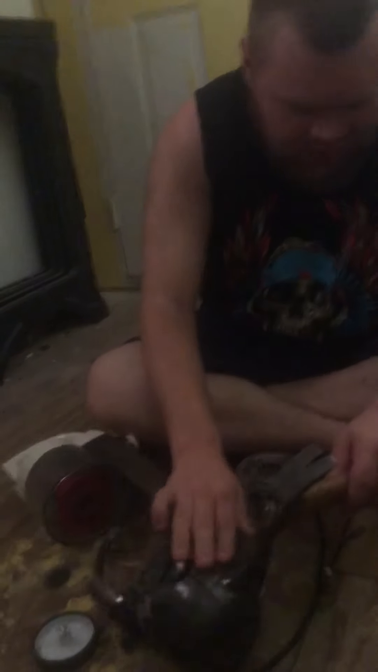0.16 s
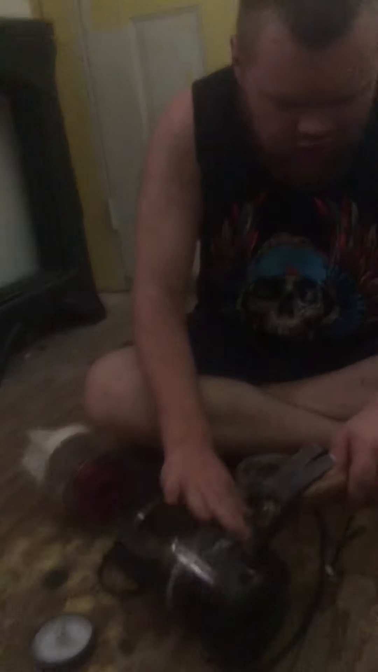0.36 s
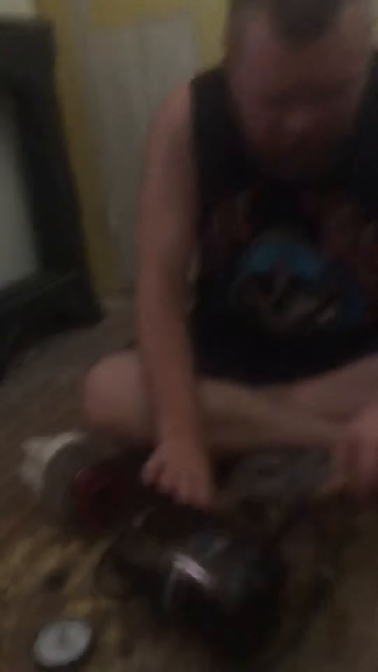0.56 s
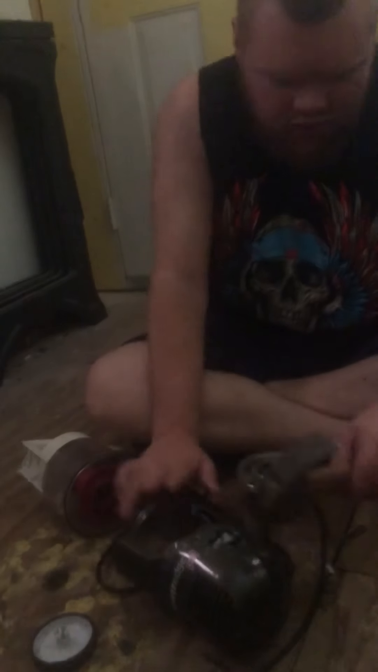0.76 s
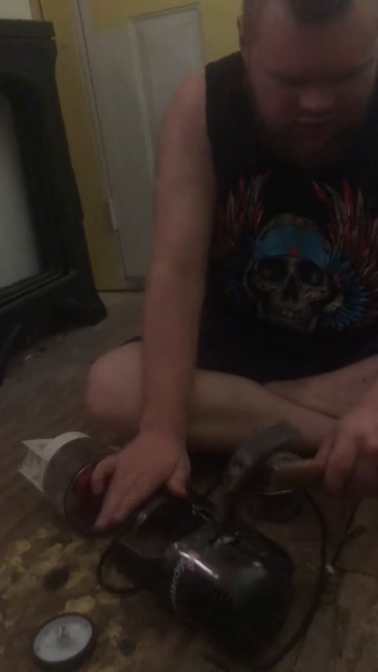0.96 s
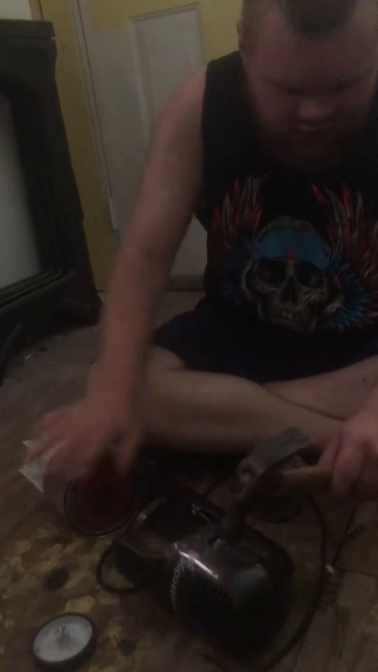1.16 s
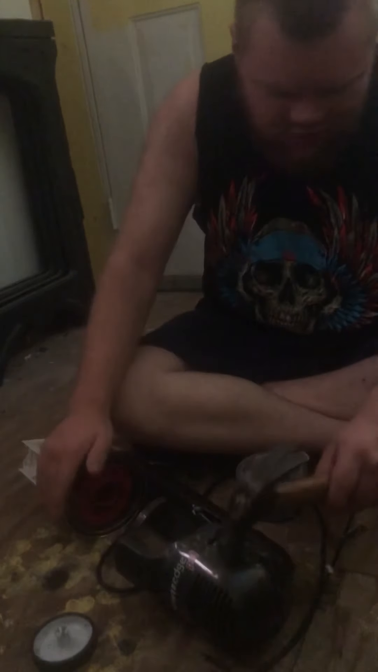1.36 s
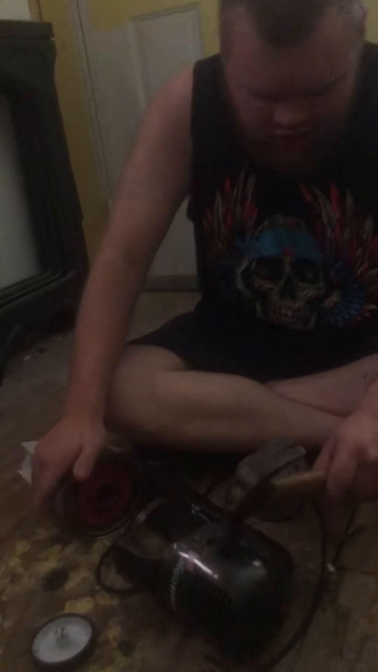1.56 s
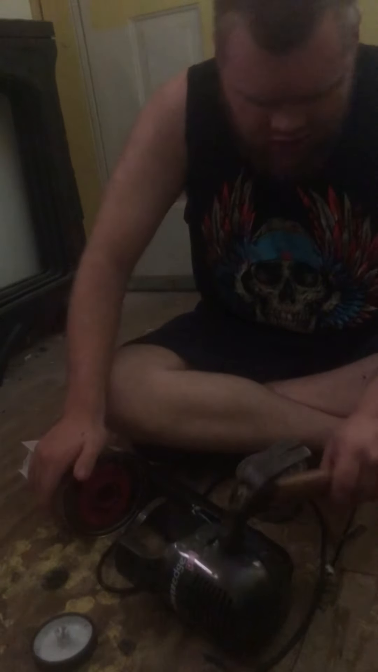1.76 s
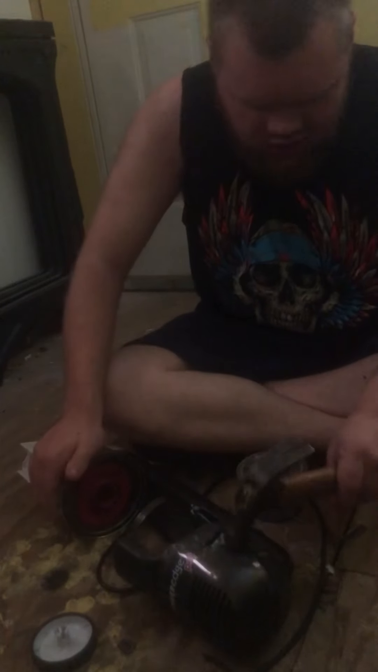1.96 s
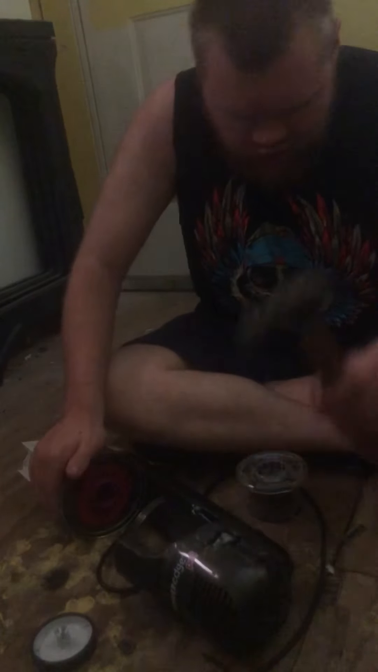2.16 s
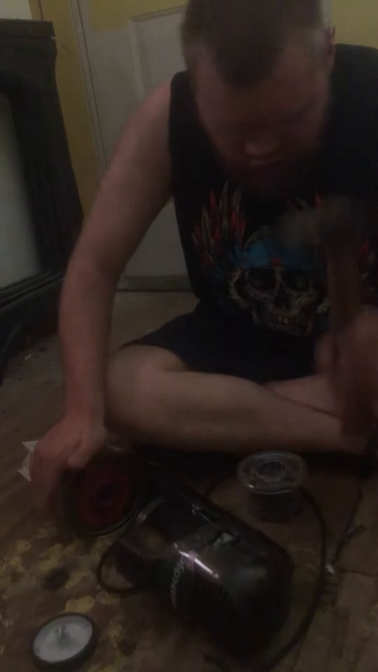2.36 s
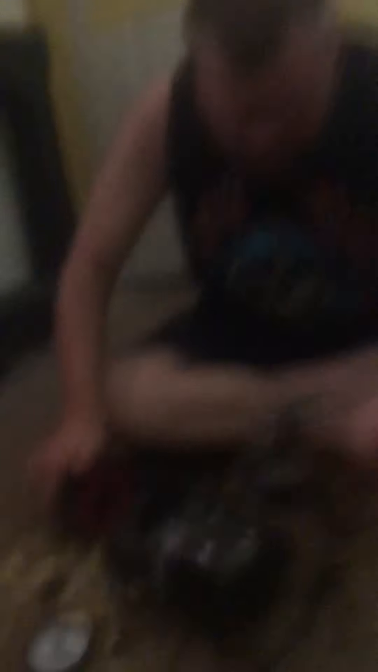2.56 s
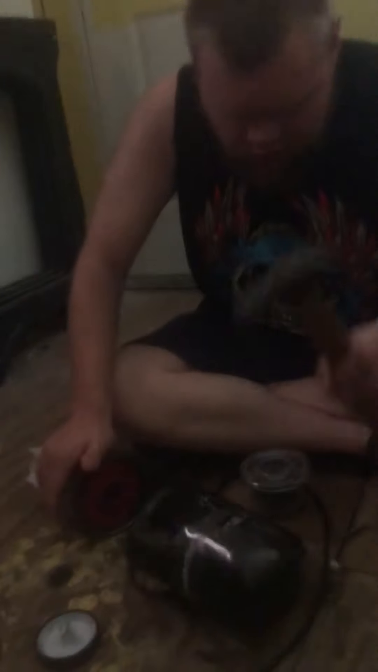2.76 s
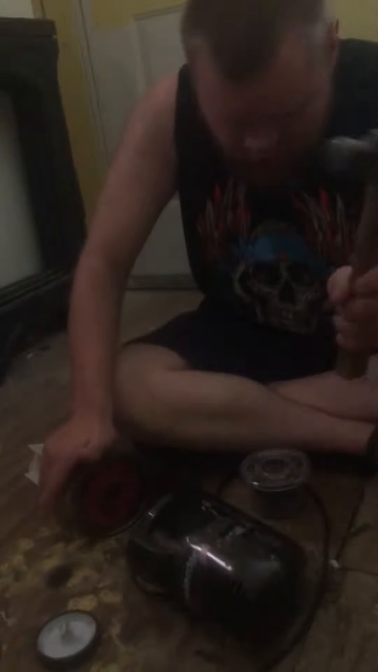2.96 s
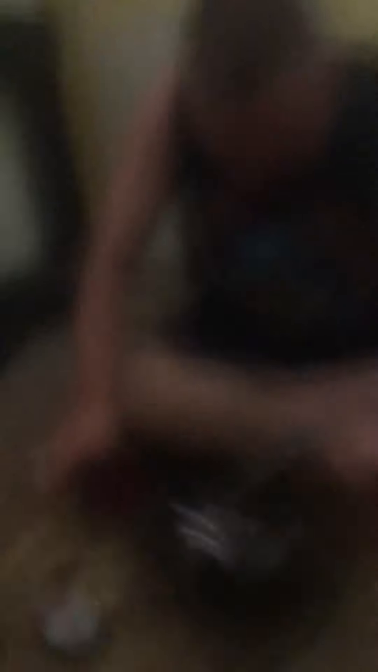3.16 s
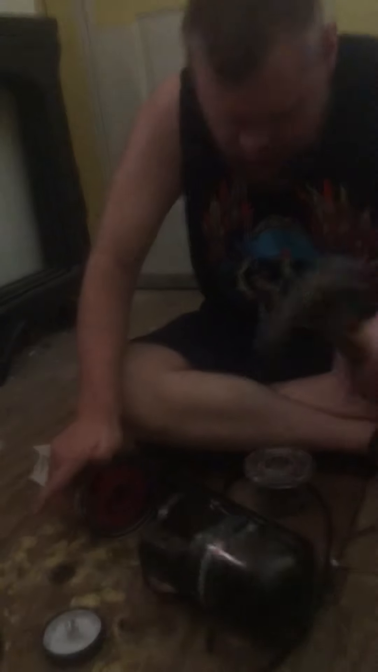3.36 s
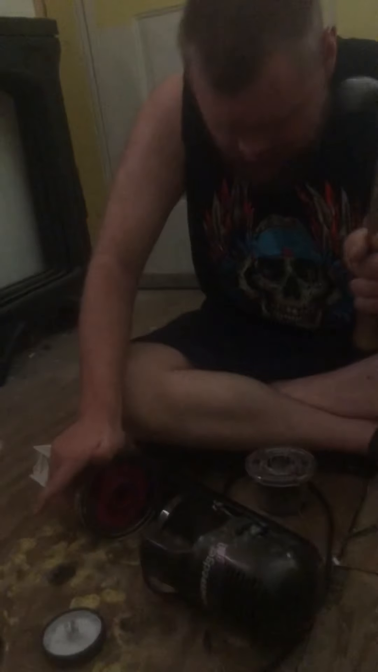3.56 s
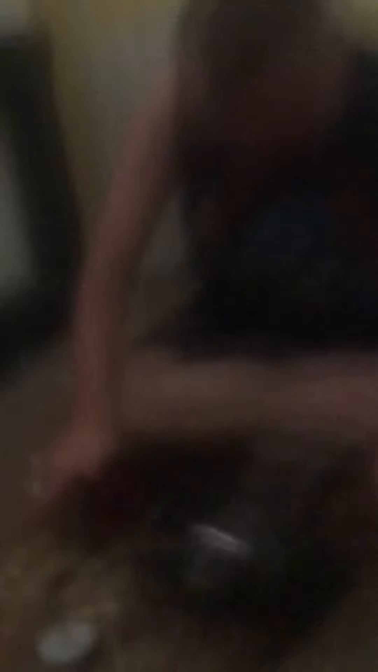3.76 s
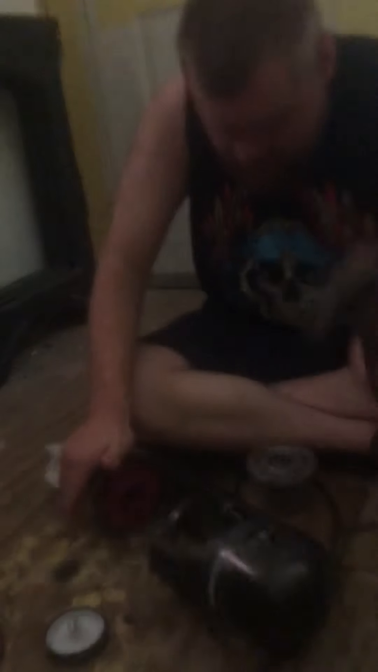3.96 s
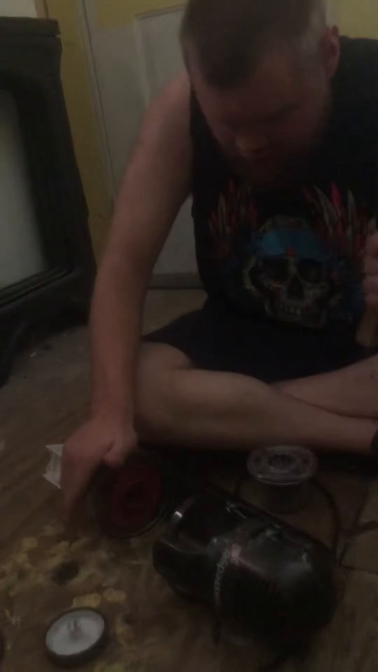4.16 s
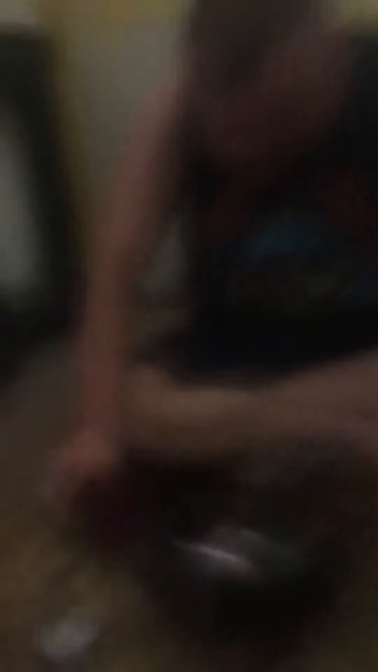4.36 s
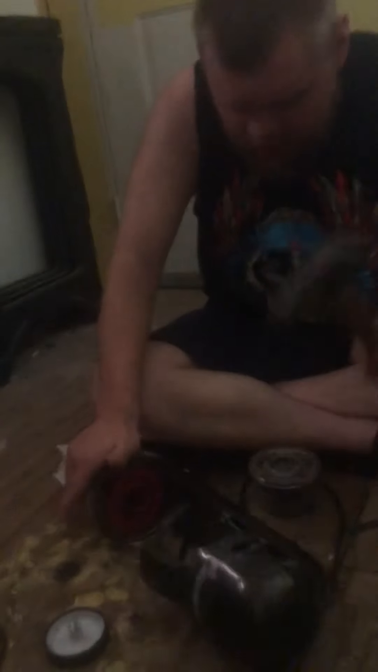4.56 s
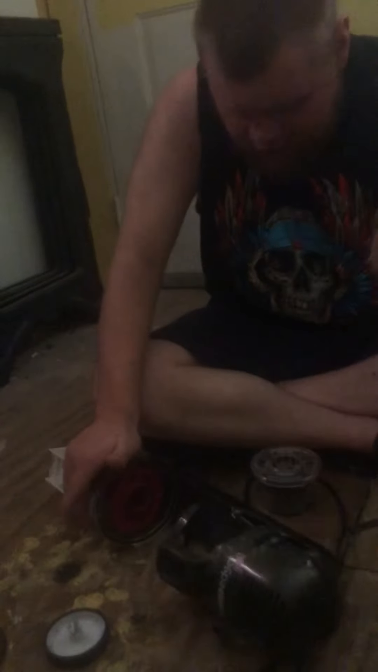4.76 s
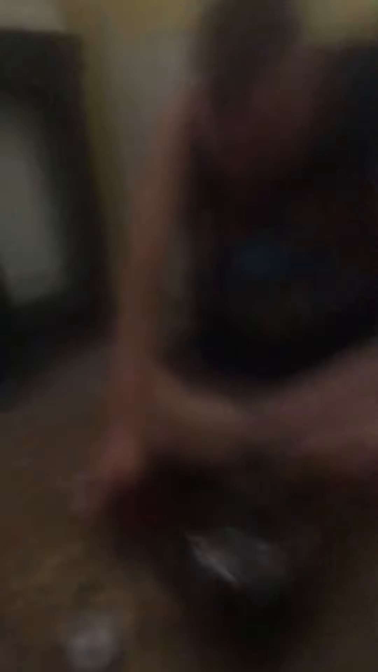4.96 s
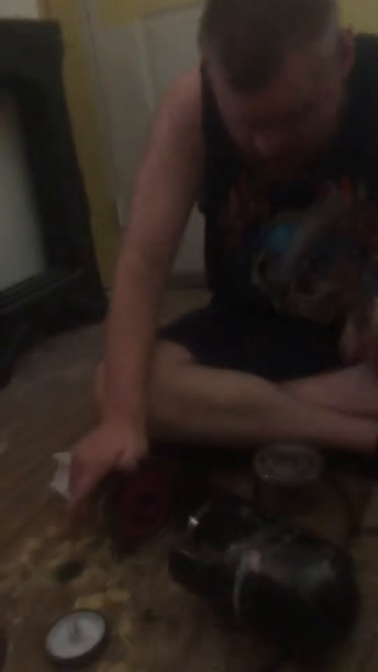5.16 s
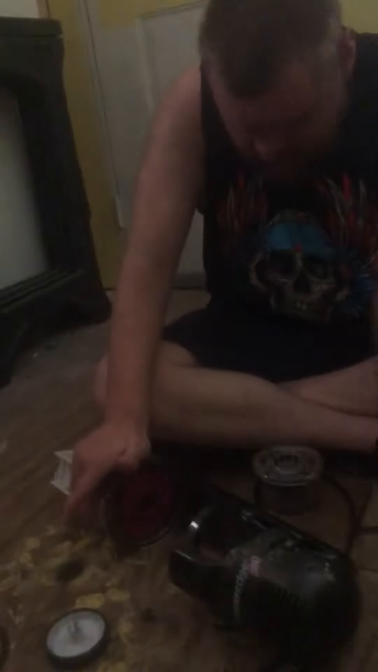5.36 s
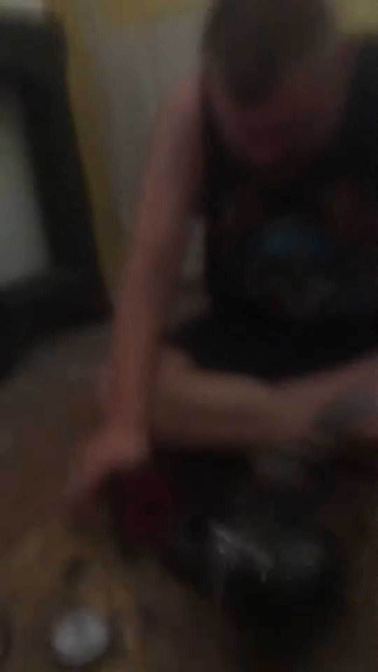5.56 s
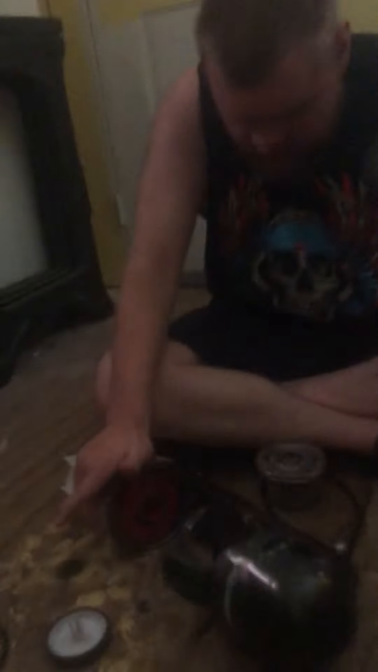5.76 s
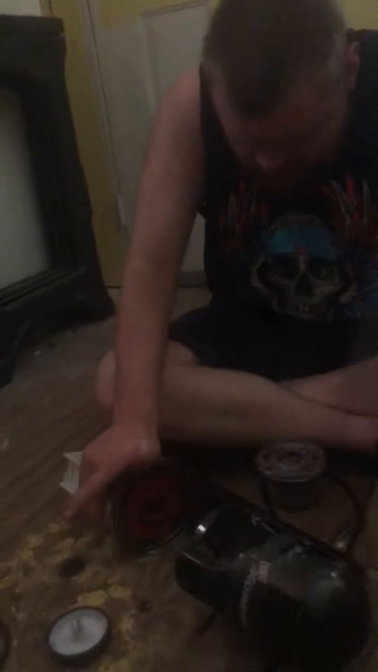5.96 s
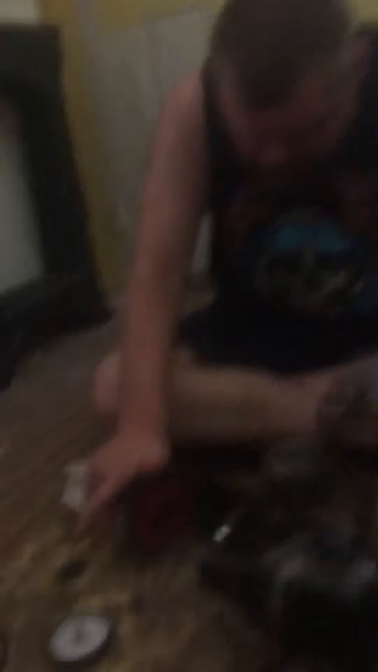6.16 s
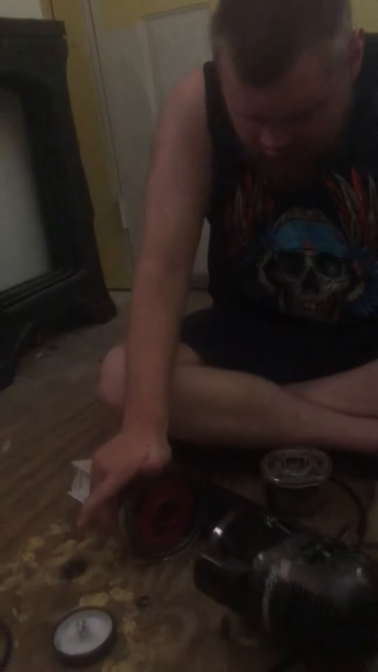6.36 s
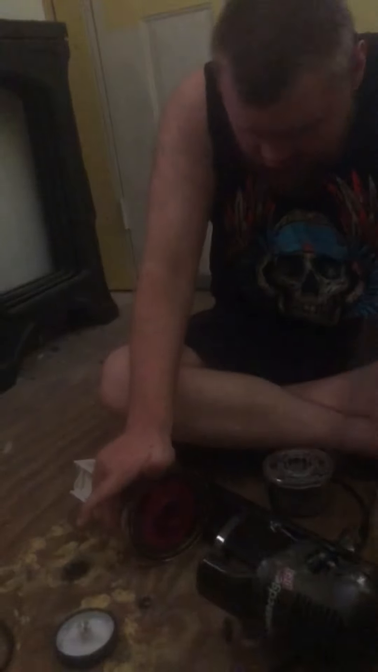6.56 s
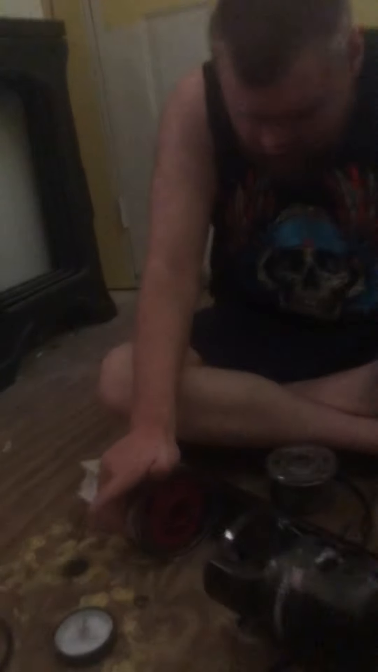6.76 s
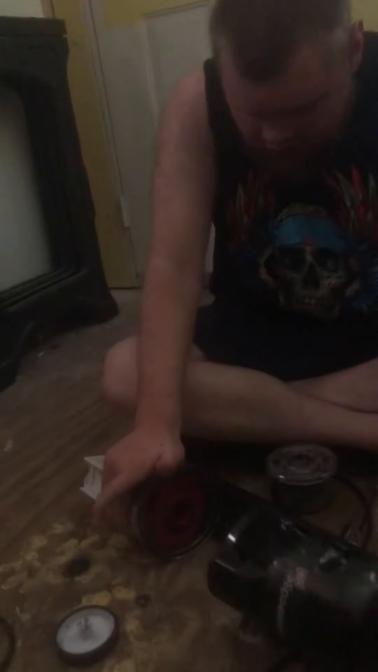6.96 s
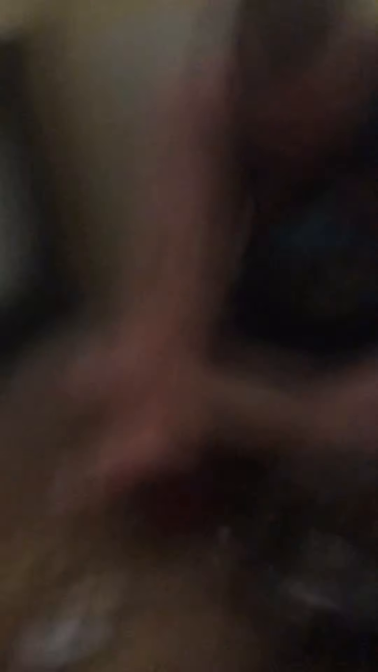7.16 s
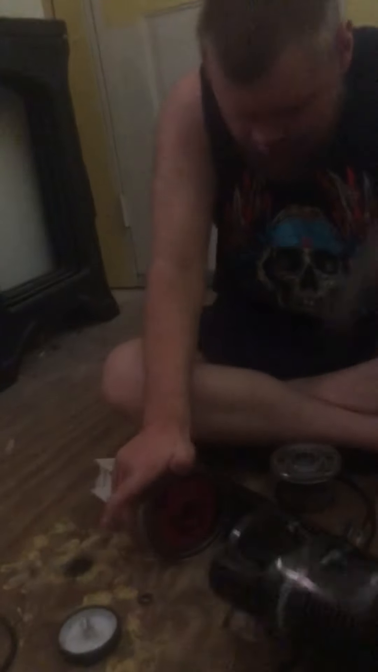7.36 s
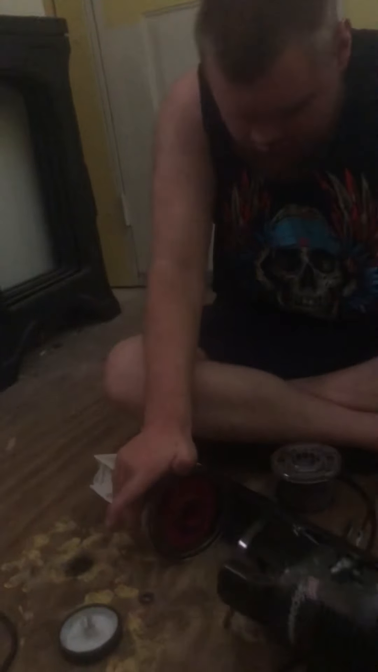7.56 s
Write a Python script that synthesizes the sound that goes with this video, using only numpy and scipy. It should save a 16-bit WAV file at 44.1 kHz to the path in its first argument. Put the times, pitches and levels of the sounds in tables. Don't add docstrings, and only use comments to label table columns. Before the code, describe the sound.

Close, slightly overloaded sound indoors on a wooden floor: a low unsteady motor whine, light handling clicks and a hollow knock, about two seconds of near calm, then nine hard hammer cracks on brittle plastic at a steady pace. Each bursts loud and compressed, rattles hollowly and dies quickly, with floor rumble. Broken bits tick, ring faintly and scrape, most audibly after later blows.

```python
import sys
import numpy as np
from scipy import signal
from scipy.fft import rfft, irfft, next_fast_len
from scipy.io import wavfile
from scipy.ndimage import uniform_filter1d

SR = 44100
rng = np.random.default_rng(int(sys.argv[2]) if len(sys.argv) > 2 else 0)


def gain_from_decibels(decibels):
    exponent = np.asarray(decibels, float) / 20
    return 10 ** exponent


def master_out(mix):
    frames = np.transpose(np.atleast_2d(mix))
    ceiling = np.clip(frames, -1, 1)
    pcm = np.round(ceiling * 32767).astype(np.int16)
    wavfile.write(sys.argv[1], SR, pcm)


N = 334754


def unit(x):
    return x / np.sqrt(np.mean(x ** 2) + 1e-20)


def along(points, hz):
    f, v = np.transpose(points)
    return np.interp(np.log(hz + 1), np.log(f + 1), v)


def filtered(x, response):
    m = next_fast_len(len(x) + 8192)
    return irfft(rfft(x, m) * response(np.fft.rfftfreq(m, 1 / SR)), m)[:len(x)]


def modes(table):
    def response(f):
        return sum((-1) ** k * gain_from_decibels(db) * 1j * f * w / (c * c - f * f + 1j * f * w)
                   for k, (c, w, db) in enumerate(table))
    return response


def high(hz):
    return lambda f: (1j * f / (hz + 1j * f)) ** 2


def wobble(count, rate_hz):
    knots = np.arange(count) * min(rate_hz, 390) / SR
    return np.interp(knots, np.arange(3100), rng.standard_normal(3100))


def gritty(count, rate_hz, depth_db):
    return rng.standard_normal(count) * gain_from_decibels(depth_db * wobble(count, rate_hz))


def evened(x, span_s):
    power = np.abs(uniform_filter1d(unit(x) ** 2, size=int(span_s * SR)))
    return x / np.sqrt(0.045 + 0.87 * power) / np.std(x)


def add(track, s, sound):
    part = track[max(round(s * SR), 0):][:len(sound)]
    part += sound[:len(part)]


def since(t, times):
    times = np.r_[-99, times]
    return t - times[np.searchsorted(times, t, side="right") - 1]


# (frequency [Hz], rms level [dB])
MOTOR = [(91.5, -50.5), (118.4, -55), (172.3, -52), (285.3, -55), (855.9, -63), (1023, -53.5),
         (1082, -63.5), (1534, -61.5), (1593, -57.5), (1647, -65), (1820, -61.5), (1981, -63.5),
         (2051, -55.5), (2083, -66), (2143, -59), (2196, -63.5), (2266, -58.5), (2326, -66), (2449, -74),
         (2896, -66.5), (3784, -63.5), (3876, -65.5), (3941, -70), (4301, -66)]
# (frequency [Hz], width [Hz], level [dB])
CASING = [(1040, 61, -1.5), (1710, 51, -6), (1750, 20, -13), (2225, 130, 3), (3927, 180, -1)]
# (frequency [Hz], density [dB per Hz])
AIR = [(180, -30.5), (300, 1), (624, -1.5), (946, 0), (1030, -6), (1150, -2), (1430, -7), (1930, -6.5),
       (2210, -2.5), (2650, -11.5), (3890, -10.5), (4750, -15.5), (16000, -34)]
# (frequency [Hz], density [dB per Hz])
RUMBLE = [(15, -42), (25, -37), (43, 5), (102, 2.5), (127, 2.5), (145, -5), (177, -2), (600, -15),
          (780, -40), (1320, -120)]


def hum():
    whine_db, rumble_db = -49, -45
    duck_db, return_db_per_s = 9.5, 1
    pinch_db, pinch_s = 12.5, 0.12
    shudder_db, shudder_t60_s, shudder_rise_s = -32, 0.96, 0.05
    t = np.arange(N) / SR
    hard_s = since(t, [b[0] for b in BLOWS[1:]])
    any_s = since(t, [b[0] for b in BLOWS])
    ducked_db = np.maximum(duck_db - return_db_per_s * hard_s, 0)
    pinched_db = pinch_db * np.exp(-(hard_s / pinch_s) ** 2)
    shudder = gain_from_decibels(shudder_db - 60 * any_s / shudder_t60_s) * (1 - np.exp(-any_s / shudder_rise_s))

    lines = np.zeros(N)
    for hz, db in MOTOR:
        level = gain_from_decibels(db - 1.0 + 1.3 * wobble(N, 9.7))
        lines += level * np.sin(2 * np.pi * hz * t + 1.1 * wobble(N, 7.8))
    air = gain_from_decibels(-50) * unit(filtered(rng.standard_normal(N), lambda f: gain_from_decibels(along(AIR, f))))
    casing = unit(filtered(rng.standard_normal(N), lambda f: modes(CASING)(f) ** 2))
    casing *= gain_from_decibels(-55 + 3.0 * wobble(N, 16))
    rumble = unit(filtered(gritty(N, 25, 0.33), lambda f: gain_from_decibels(along(RUMBLE, f))))
    whine = gain_from_decibels(whine_db + 50 - ducked_db - pinched_db) * (lines + air + casing)
    return whine + np.hypot(gain_from_decibels(rumble_db - ducked_db), shudder) * rumble


# (time [s], peak [dB], centre [Hz], knock [dB])
HANDLING = [(0.475, -16.5, 4280, 5), (0.5, -30, 5000, -8), (0.5132, -23, 11090, -25),
            (0.527, -31, 9400, -25), (0.5394, -31, 8540, -20), (1.281, -32, 5070, -5),
            (1.5464, -31, 4520, 3), (2.0482, -44, 15000, -5), (2.2154, -44, 4640, 0),
            (2.356, -38, 8580, -5)]
# (time [s], peak [dB], centre [Hz], knock [dB])
CHIPS = [(2.7646, -40, 6360, -12), (3.41, -30.5, 6900, -13), (4.5075, -20.5, 5350, -25),
         (4.5752, -32, 7340, -17), (4.728, -42, 5700, 4), (5.1334, -28, 4650, -15), (5.17, -29, 5900, -26),
         (5.187, -33, 5180, -20), (5.233, -39, 5570, 4), (5.244, -33, 5250, -2.5), (5.6131, -15, 4940, -19),
         (5.6284, -18.5, 7600, -16), (5.66, -20, 5800, -24), (5.6975, -26.5, 7500, -19),
         (5.7565, -30, 5400, -6), (5.8456, -30.5, 8100, -10), (5.884, -31.5, 7080, -7),
         (6.2007, -25, 7140, -1.5), (6.3037, -36, 7450, -1), (6.3335, -22, 4370, -13),
         (6.4412, -42, 4640, 8.5), (6.4552, -27.5, 5860, -8), (6.467, -34.5, 11100, 0.5),
         (7, -26, 4750, -16), (7.3374, -16, 4630, -31), (7.4507, -41, 11500, -22), (7.456, -27, 11400, -9),
         (7.5333, -34, 5560, -5), (7.5473, -45.5, 4960, 9), (7.561, -39, 4970, 4)]
# (time [s], frequency [Hz], level [dB], t60 [s])
PINGS = [(6.304, 7500, -50, .03), (6.455, 5850, -47.5, 0.13), (5.62, 1390, -38, 0.12),
         (6.468, 10800, -49, 0.14), (7.41, 7300, -54, 0.089), (7.451, 11350, -36, 0.056),
         (7.456, 11500, -48, 0.06), (7.456, 15300, -42, .1), (7.54, 9600, -84, 0.18)]
SLIDE_STARTS = [0.004, 1.5, 7.0, 7.35]
# (length [s], level [dB], centre [Hz])
SLIDES = [
    (0.11, -48.5, 3200),
    (0.13, -51, 690),
    (0.049, -43, 3000),
    (0.054, -29.5, 5500),
]


def chips():
    out, t = np.zeros(N), np.arange(9000) / SR
    for s, db, hz, knock_db in HANDLING + CHIPS:
        tick_noise, knock_noise, wall_noise = rng.standard_normal((3, len(t)))
        in_hand = s < BLOWS[1][0]
        t60_s, walls_db = (0.0089, -22.5) if in_hand else (0.013, -15.5)
        shape = gain_from_decibels(-60 * t / t60_s) * (1 - np.exp(-t / 0.00071))
        tail = gain_from_decibels(walls_db - 60 * t / 0.29) * (1 - np.exp(-t / 0.0053))
        colour = lambda f: modes([(hz, 0.7 * hz, 0)])(f) + gain_from_decibels(-6.5) * high(8000)(f)
        tick = filtered(tick_noise * shape, colour)
        tick += filtered(wall_noise * tail, lambda f: colour(f) / (1 + 1j * f / 9000))
        knock = filtered(knock_noise * (shape + tail), lambda f: high(700)(f) / (1 + 1j * f / 2200) ** 2)
        add(out, s, gain_from_decibels(db + 2.0) * tick + gain_from_decibels(db + knock_db + 15) * knock)
    for s, hz, db, t60_s in PINGS:
        ring = unit(filtered(rng.standard_normal(len(t)), modes([(hz, 180, 0)])))
        decay = gain_from_decibels(-60 * t / t60_s) + 1.8 * gain_from_decibels(-60 * t / 0.019)
        add(out, s, gain_from_decibels(db) * decay * ring)
    for s, (length_s, db, hz) in zip(SLIDE_STARTS, SLIDES):
        skid = unit(filtered(gritty(len(t), 286, 1.7), lambda f: modes([(hz, 1.6 * hz, 0)])(f) ** 2))
        add(out, s, gain_from_decibels(db) * skid * np.exp(-t / length_s) * (1 - np.exp(-t / 0.0016)))
    return out


# (time [s], peak [dB], frequency [Hz])
BUMPS = [(0.147, -21, 64.6), (0.393, -1, 240), (0.396, 3, 573), (0.41, -10, 543), (0.478, -1.5, 590),
         (0.501, -36, 67.3), (0.52, -7.5, 69), (0.533, -10, 72), (0.617, -18, 83.4), (0.793, -22, 85.5),
         (2.499, -24, 320), (2.53, -6, 297), (2.699, -19.5, 176), (3.164, -10, 260), (3.176, 6, 298),
         (3.791, 2.5, 270), (4.365, -15, 80.5), (5.227, -28, 88.8), (5.478, -17, 68), (5.52, -23, 342),
         (5.757, -18.5, 210), (5.8, -22.5, 76), (6.072, 2, 241), (6.628, -3.5, 246), (7.189, -37, 171),
         (7.415, -19.5, 209)]


def bumps():
    out, t = np.zeros(N), np.arange(6000) / SR
    for s, db, hz in BUMPS:
        decay = gain_from_decibels(db - 4.5 - 60 * t * hz / 6)
        add(out, s, decay * np.sin(2 * np.pi * hz * t) * (1 - np.exp(-t / 0.0017)))
    return out


# (time [s], peak [dB], knock [dB], snap [dB], face ring [Hz])
BLOWS = [
    (0.39, -33, 25.5, -32.5, 1920),
    (2.4403, -3.5, -8.5, -5, 2820),
    (3.102, -7, -9.5, 11, 4500),
    (3.7341, -2.5, -6.5, -26, 2240),
    (4.3169, -4.5, -8.5, -25, 2640),
    (4.9128, -2.5, -8.5, -13.5, 8270),
    (5.4661, -1, -5, -11, 2040),
    (6.0204, -1, -10.5, -20.5, 4040),
    (6.5773, 2, -13.5, -24, 3070),
    (7.1314, -1.5, -3, -11, 2800),
]
# (brightness [dB per octave], hollow note [dB], hollow note [Hz], push lag [s], snap length [s])
STRUCK = [(-6.5, 3.5, 262, 0.0042, 0.0043), (5, 5, 310, 0.00073, 0.0088), (6, 3, 304, 0.0063, 0.0059),
          (3.5, 4, 265, 0, 0.0067), (2, -2, 298, -0.0044, 0.0072), (4.5, -2, 277, 0.018, 0.0045),
          (3, 0, 320, -0.0008, 0.0039), (5.5, -3, 204, 0.016, 0.0063), (5.5, 1, 238, -.0005, 0.0077),
          (3, 1, 197, -0.0093, 0.0039)]
EARLY = [-60, -25.5, -32, -31, -29, -31.5, -28.5, -31.5, -31, -33.5]


def cracks():
    lead_s = 1000 / SR
    out, t = np.zeros(N), np.arange(2048) / SR

    def burst(length_s, rise_s):
        shape = np.exp(-(t / length_s) ** 3) * (1 - np.exp(-(t / rise_s) ** 2))
        return gritty(len(t), 250, 2.6) * shape

    for (s, db, knock_db, snap_db, ring_hz), (*_, held_s), early_db in zip(BLOWS, STRUCK, EARLY):
        def face_colour(f):
            broad = 0.96 * high(2000)(f) ** 2 / (1 + 1j * f / 7000) ** 2
            return broad + 0.29 * modes([(ring_hz, 1500, 0)])(f) ** 2

        snap = gain_from_decibels(snap_db - 11.5) * filtered(burst(0.25 * held_s, 0.00032), high(6500))
        snap += 0.33 * filtered(burst(0.00087, 0.0002), lambda f: high(5000)(f) ** 2)
        face = filtered(burst(held_s, 0.00016), face_colour)
        knock = filtered(burst(2.14 * held_s, 0.0017), lambda f: high(450)(f) ** 2 / (1 + 1j * f / 1400) ** 2)
        hit = snap + face + gain_from_decibels(knock_db + 9) * knock
        swell = np.where(t < lead_s, gain_from_decibels(-2.5 - 710 * (lead_s - t)), 0)
        rush = filtered(swell * rng.standard_normal(len(t)),
                         lambda f: 1 / (1 + 1j * f / 3500) + 0.44 * modes([(3200, 250, 0)])(f))
        add(out, s, gain_from_decibels(db + 1.5) * hit)
        add(out, s - lead_s, gain_from_decibels(db + early_db) * (hit + rush))
    return out


# (delay [s], level [dB])
RETURNS = [(0.017, 1), (0.0321, -2.5), (0.043, -9), (0.0616, -4), (0.079, -23), (.091, -12), (0.109, -23.5),
           (0.123, -17)]


def pushes():
    push_db, grows = -12.5, 0.18
    out, t = np.zeros(N), np.arange(-700, 700) / SR
    pulse = 0.4 * np.exp(-((t + 0.002) / 0.007) ** 2) - 1.4 * np.exp(-(t / 0.0019) ** 2)
    for blow, (*_, lag_s, _) in zip(BLOWS, STRUCK):
        for (delay_s, db), (d, e) in zip(RETURNS, rng.standard_normal((len(RETURNS), 2))):
            at_s = blow[0] + delay_s + lag_s + 0.00089 * d - 700 / SR
            add(out, at_s, gain_from_decibels(push_db + grows * blow[1] + db + 0.77 * e) * pulse)
    return out


# (time [s], level [dB])
REBOUNDS = [(0.476, -38), (0.7, -65), (2.525, -53), (3.414, -76), (5.84, -55.5), (6.332, -54), (7.36, -43),
            (7.456, -55)]


def answer(t, start_s, clatter_db, hold_s, fall_db_per_s):
    knee_s, sag_db_per_s = 0.0093, 27
    past = knee_s * np.logaddexp(0, (t - hold_s) / knee_s)
    dip_db = 5 * np.exp(-((t - 0.014) / 0.007) ** 2)
    settle_db = 2 * (1 - np.exp(-past / 0.03))
    gain = gain_from_decibels(clatter_db - dip_db - sag_db_per_s * (t - past) - fall_db_per_s * past - settle_db)
    for s, db in REBOUNDS:
        late = np.maximum(t + start_s - s, 0) * (s > start_s)
        gain = np.hypot(gain, gain_from_decibels(db - 186 * late) * (1 - np.exp(-late / 0.004)))
    return gain * np.clip((ANSWER_S - t) / 0.03, 0, 1)


ANSWER_S = 0.55
# (clatter [dB], hold [s], fall [dB per s], shell [dB], boards [dB])
AFTER = [(-31, 0.017, 188, 8, 14.5), (-23, 0.093, 196, -0.5, 5.5), (-22.5, 0.073, 170, 4, 6.5),
         (-21, 0.073, 168.5, 3, 4), (-17, 0.064, 187, -1.5, -1.5), (-18, 0.058, 164, 0.5, 5.5),
         (-16.5, 0.053, 176, 2.5, 5), (-16, 0.061, 179, -1.5, 5), (-18, 0.07, 185, -0.5, -1.5),
         (-18.5, 0.069, 196, 3.5, 4.5)]
# (frequency [Hz], density [dB per Hz])
CLATTER = [(710, -28.5), (1200, -5), (1940, -19), (2220, 0), (3590, -1), (7090, -6), (11700, -16.5),
           (15100, -20.5), (16000, -9), (16500, -61)]
# (frequency [Hz], width [Hz], level [dB])
SHELL = [(667, 230, -22), (1330, 260, -7), (1580, 90, -20), (2140, 190, -19), (2240, 120, -24)]
# (multiple of hollow note [ratio], relative width [ratio], level [dB])
HOLLOW = [(0.601, 0.41, -13.5), (1, 0.18, 0), (1.3, 0.53, -7.5)]


def aftermath():
    shell_lingers_db_per_s, boards_linger_db_per_s = 5, 22
    out, count = np.zeros(N), int(ANSWER_S * SR)
    t = np.arange(count) / SR
    start = lambda lag_s: np.clip(t / lag_s, 0, 1) ** 2
    for blow, after, (bright_db, hollow_db, hollow_hz, *_) in zip(BLOWS, AFTER, STRUCK):
        clatter_db, hold_s, fall_db_per_s, shell_db, boards_db = after
        level = answer(t, blow[0], clatter_db, hold_s, fall_db_per_s)

        hz, frame_s, z = signal.stft(gritty(count, 220, 0.71), SR, nperseg=256)
        octaves = np.log2(np.maximum(hz, 1000) / 3500)[:, None]
        tilt_db = octaves * (bright_db - 28 * np.clip(frame_s - 0.06, 0, 0.13))
        patches = uniform_filter1d(rng.standard_normal(z.shape), size=3, axis=0)
        patches = uniform_filter1d(patches, size=5, axis=1)
        gain = gain_from_decibels(along(CLATTER, hz)[:, None] + tilt_db + 1.86 * unit(patches))
        z = z * gain / np.sqrt(np.mean(gain ** 2, axis=0))
        clatter = unit(signal.istft(z, SR, nperseg=256)[1][:count])

        shifts = rng.standard_normal((len(SHELL), 2))
        detuned = [(c * (1 + 0.026 * d), w, db + 2.2 * e) for (c, w, db), (d, e) in zip(SHELL, shifts)]
        panels = [(c, 0.026 * c, -8) for c in np.sort(450 * 6 ** rng.random(size=15))]

        def body(f):
            ringing = sum(np.abs(modes([m])(f)) ** 2 for m in detuned + panels)
            return np.sqrt(ringing + np.abs(0.64 * high(300)(f) / (1 + 1j * f / 1900) ** 2) ** 2)

        shell = evened(filtered(gritty(count, 140, 3), body), 0.018)
        shell *= gain_from_decibels(shell_db + shell_lingers_db_per_s * t)

        hollow = modes([(k * hollow_hz, w * hollow_hz, db) for k, w, db in HOLLOW])
        low = lambda f: 0.73 * modes([(72, 40, 0)])(f) + gain_from_decibels(hollow_db - 3.0) * hollow(f)
        boards = evened(filtered(gritty(count, 55, 1.8), low), 0.022)
        boards *= gain_from_decibels(boards_db - 2.0 + boards_linger_db_per_s * t)
        add(out, blow[0], level * (start(0.0057) * clatter + start(0.018) * shell + start(0.02) * boards))
    return out


def scene():
    return (hum() + chips() + bumps() + cracks() + pushes() + aftermath())[None]


def roll_off(x):
    return signal.sosfilt(signal.butter(12, 17100, fs=SR, output="sos"), x)


def record(dry):
    top_hz, ceiling = 15900, 0.78
    x = filtered(dry[0], lambda f: np.abs(high(20)(f)) ** 2)
    soft = x / (1 + np.abs(x / ceiling) ** 4) ** (1 / 4)
    edge_db = lambda f: np.interp(f, [top_hz - 250, top_hz + 250, 17000], [0, -36, -60])
    mix = filtered(soft, lambda f: gain_from_decibels(edge_db(f)))[None]
    return roll_off(mix)


dry = scene()
out = record(dry)
master_out(out)
```